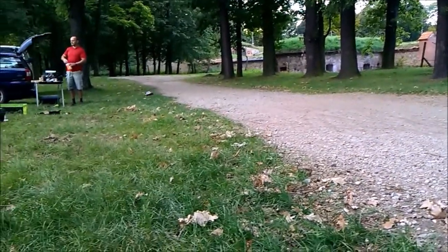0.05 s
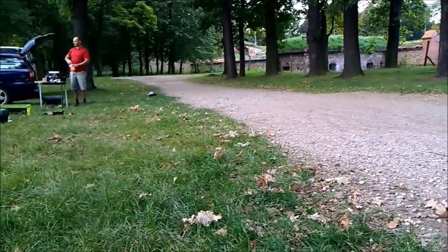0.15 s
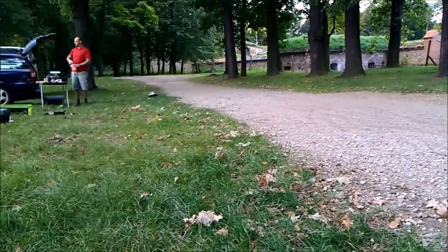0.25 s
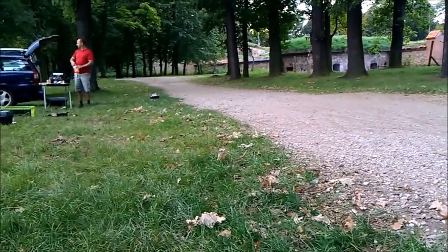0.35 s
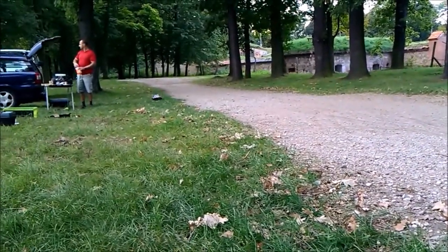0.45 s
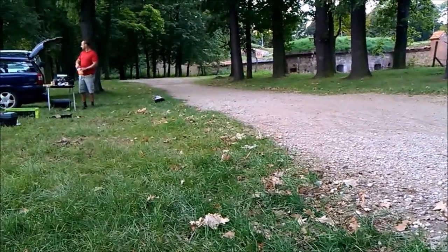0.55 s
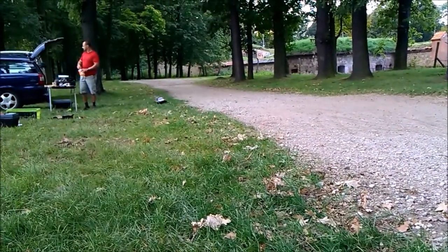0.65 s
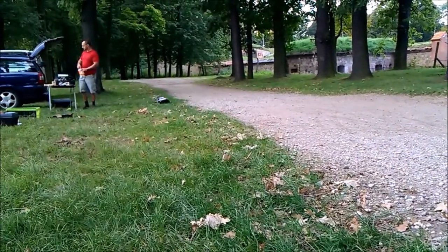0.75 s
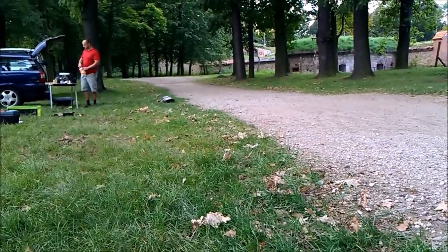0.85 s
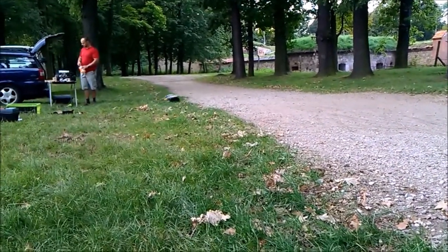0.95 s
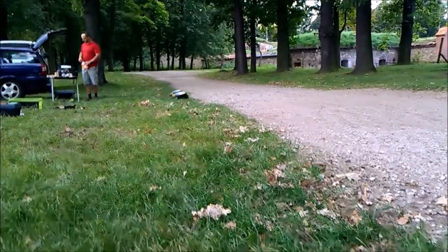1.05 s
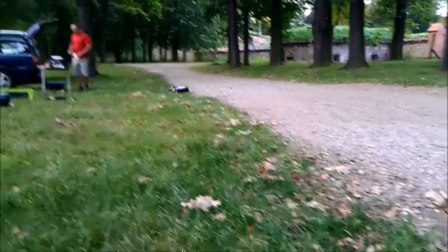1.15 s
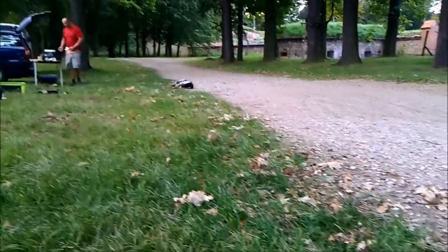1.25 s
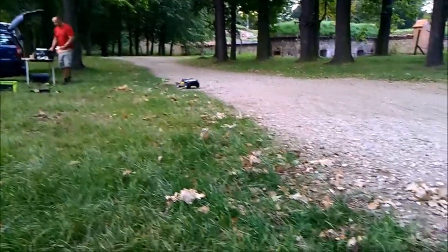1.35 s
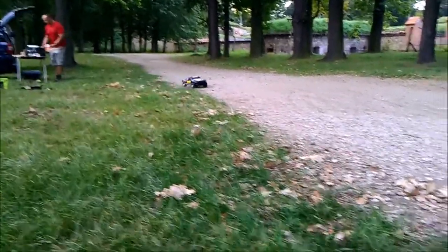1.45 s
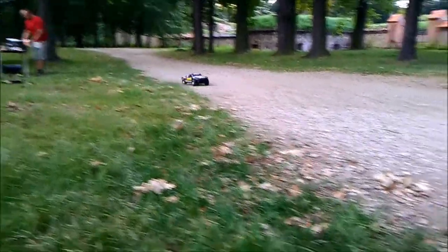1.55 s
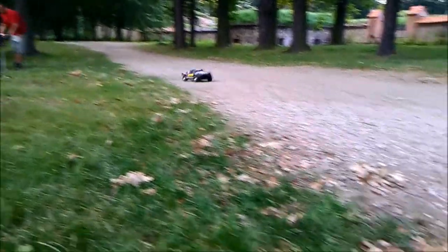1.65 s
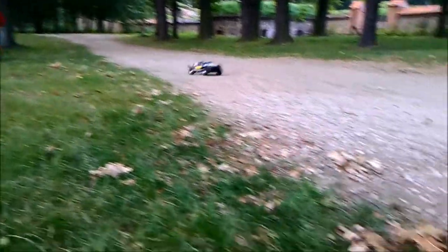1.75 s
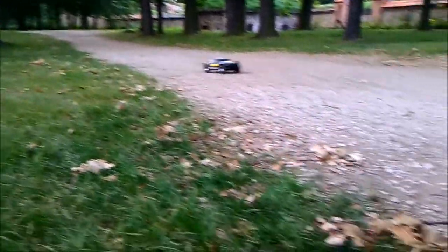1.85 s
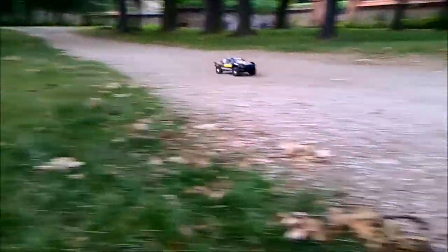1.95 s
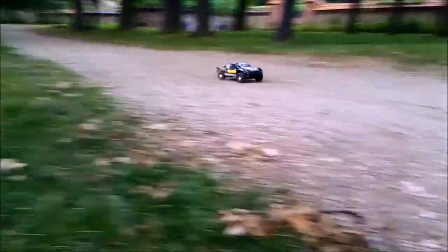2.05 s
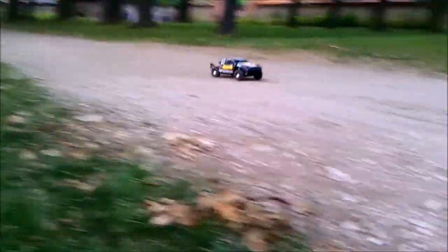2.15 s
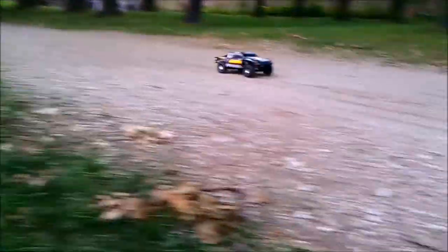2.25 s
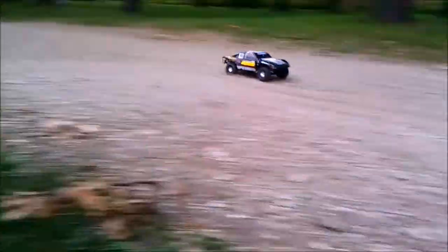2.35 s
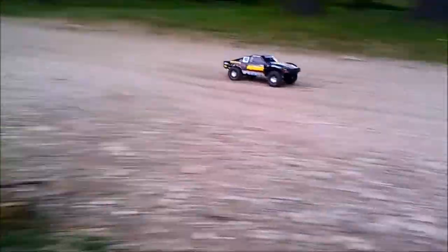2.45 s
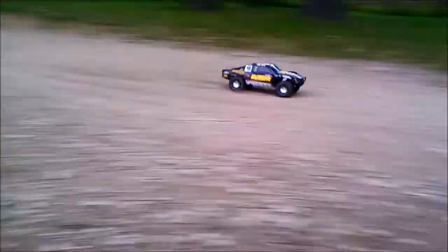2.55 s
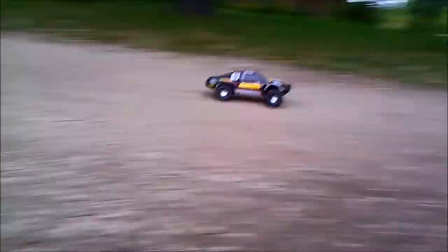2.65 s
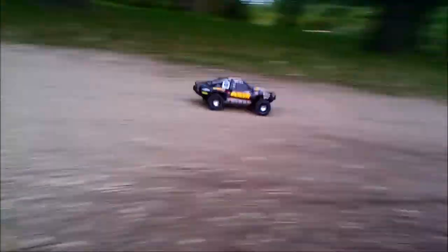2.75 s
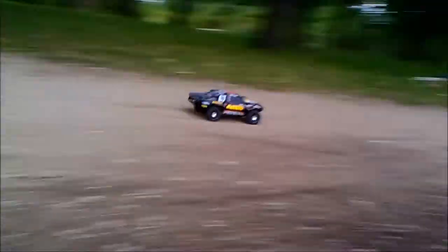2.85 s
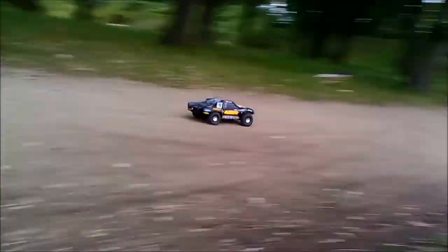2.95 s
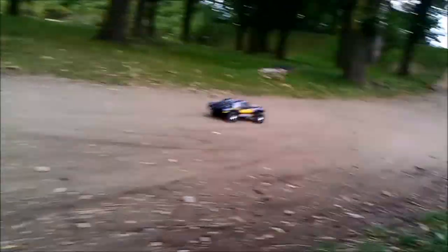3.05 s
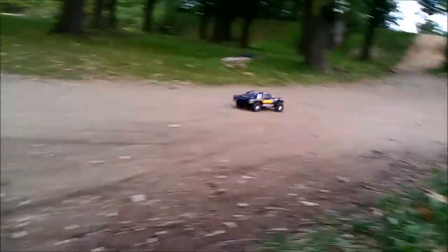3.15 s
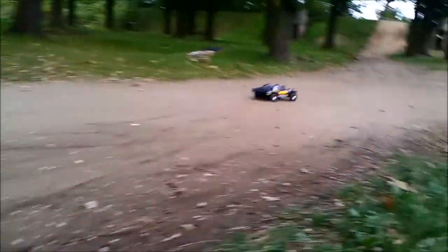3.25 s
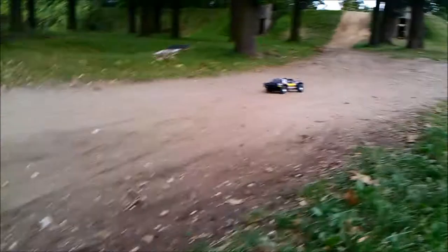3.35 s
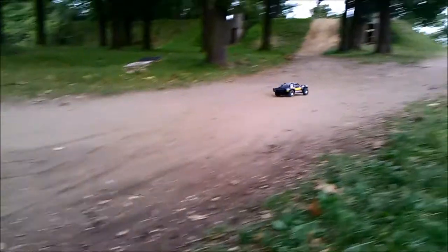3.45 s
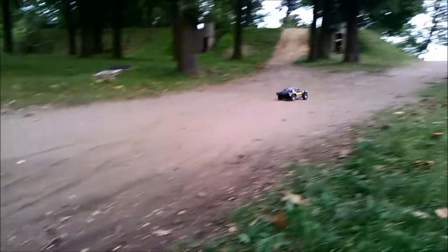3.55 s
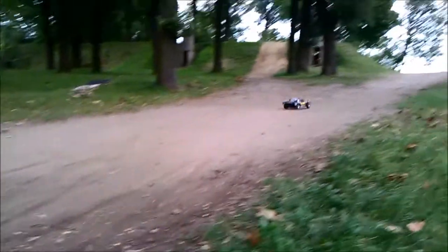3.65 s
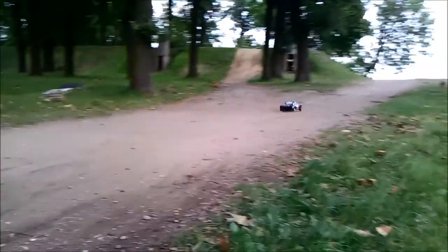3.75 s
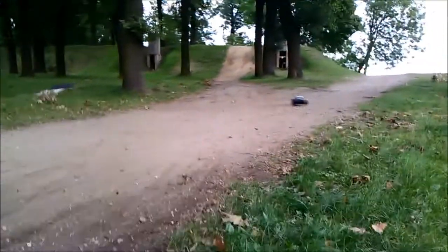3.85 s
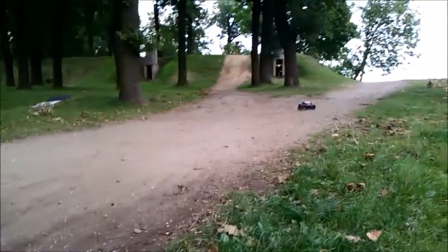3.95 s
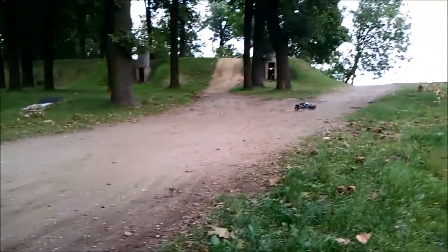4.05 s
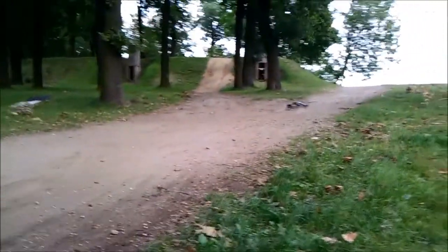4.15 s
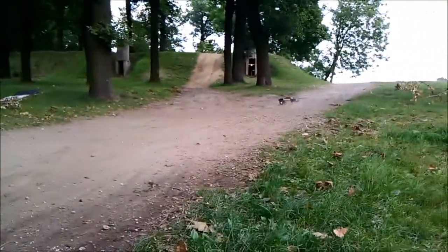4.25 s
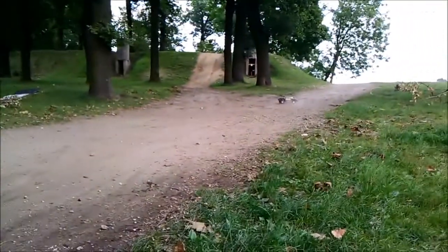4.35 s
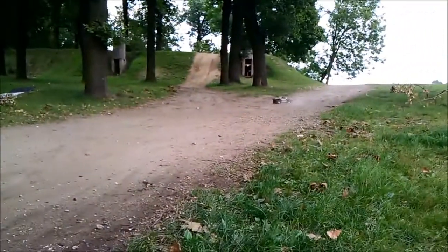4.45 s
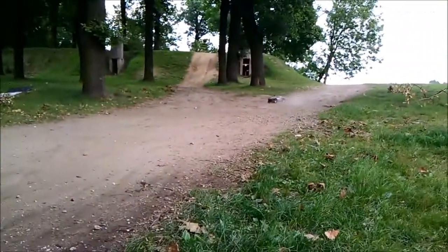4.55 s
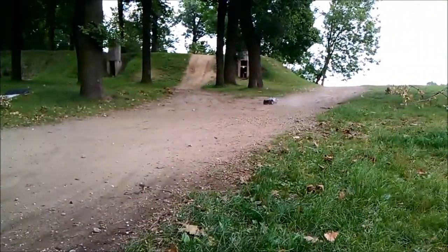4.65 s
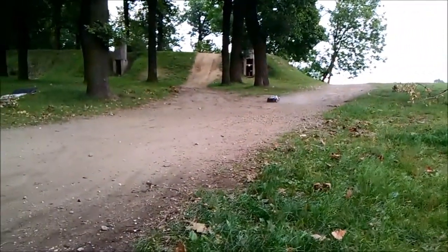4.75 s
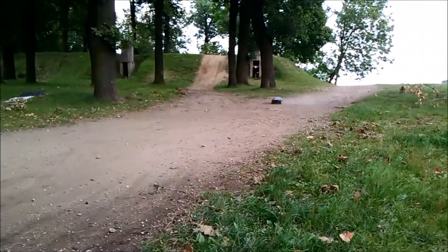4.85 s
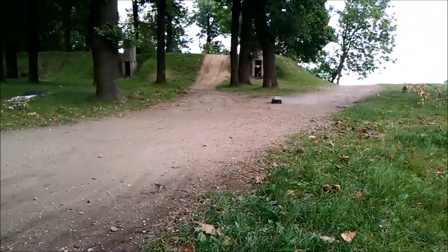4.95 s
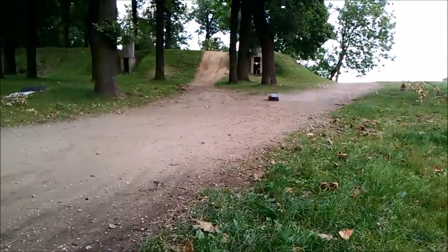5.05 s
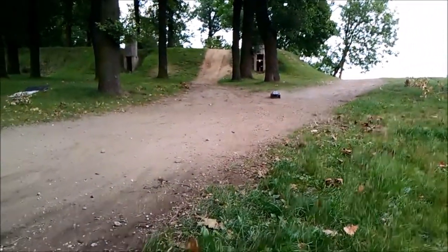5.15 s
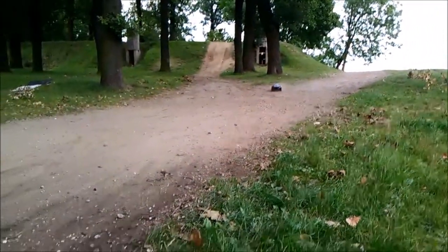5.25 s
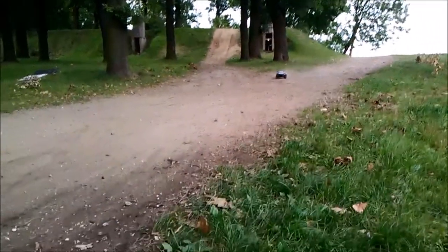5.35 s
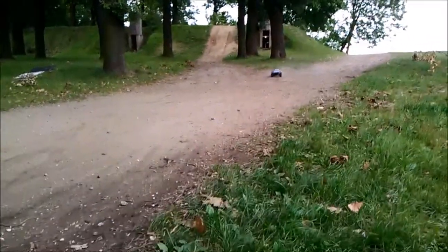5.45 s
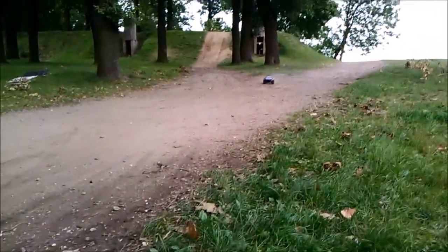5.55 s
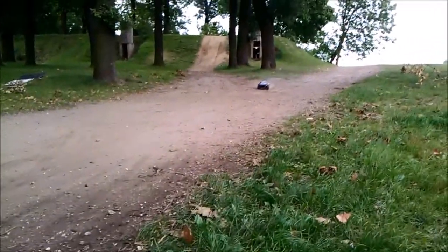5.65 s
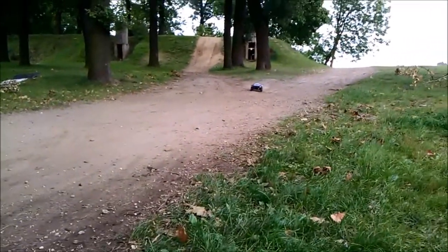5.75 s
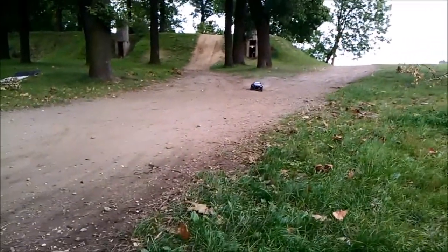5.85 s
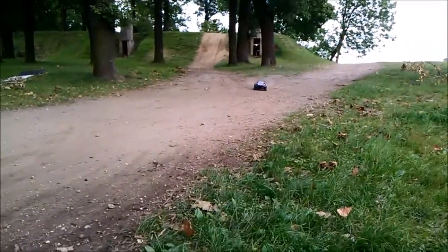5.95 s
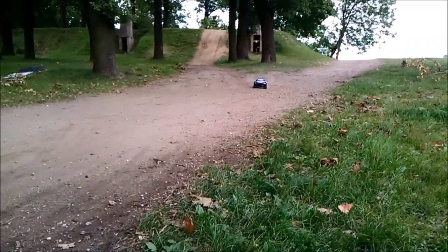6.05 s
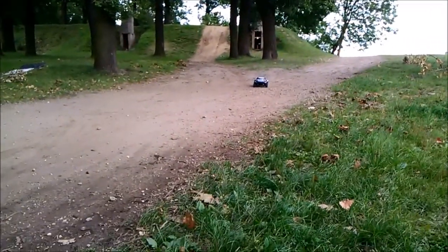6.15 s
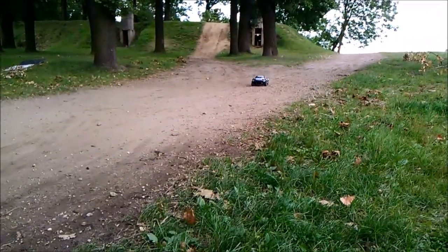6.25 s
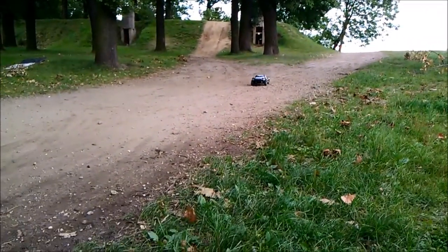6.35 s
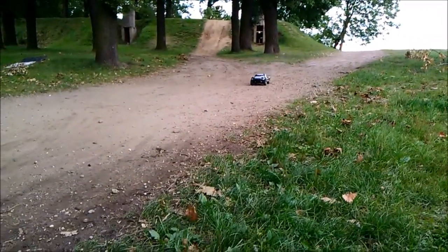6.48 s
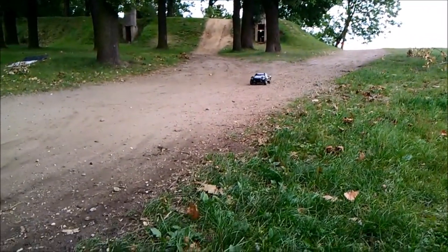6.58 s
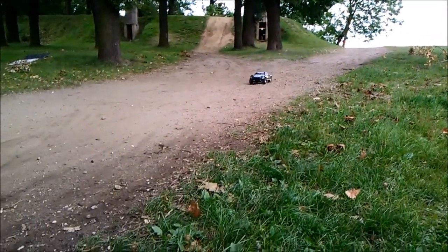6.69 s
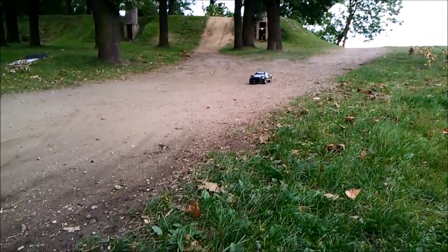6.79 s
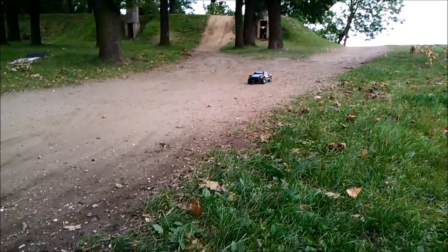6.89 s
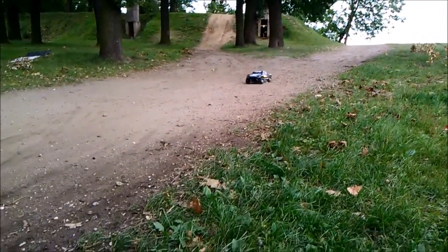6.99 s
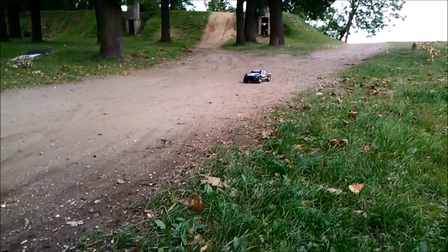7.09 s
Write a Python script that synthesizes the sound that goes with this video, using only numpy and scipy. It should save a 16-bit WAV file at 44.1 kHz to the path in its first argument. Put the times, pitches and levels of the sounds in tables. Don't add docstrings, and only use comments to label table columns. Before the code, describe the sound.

Outdoors in a park, a small electric model truck approaches on gravel, its worn gears whining higher as tyres crunch and drum its hollow plastic shell. It passes close, stones ticking and rapping, recedes, skids with a harsh grit burst, quiets, then sets off again. A far car hums through two gears early; wind puffs bump the open phone microphone.

```python
import sys
import numpy as np
from scipy import signal
from scipy.fft import rfft, irfft
from scipy.io import wavfile
from scipy.ndimage import uniform_filter1d

SR = 44100
rng = np.random.default_rng(int(sys.argv[2]) if len(sys.argv) > 2 else 0)


def how_loud(loudness_db):
    steps = np.asarray(loudness_db, float) / 20
    return 10 ** steps


def transcribe(signal):
    frames = np.atleast_2d(signal).T
    limited = np.clip(frames, -1, 1)
    pcm = np.round(limited * 32767).astype(np.int16)
    wavfile.write(sys.argv[1], SR, pcm)


N = 313992

# start_s, loudness_db, tyre_scrub_db, throttle_db, shell_ringing_share
DRIVE = [(0, -48, .5, -1.5, .3), (.45, -50, 2.5, 0.5, 0.37), (.9, -45, 1.5, 1.5, 0.43),
         (1.45, -42.5, 2.5, 1.5, 0.47), (1.85, -37.5, -5.5, 1, 0.2), (2.15, -35.5, -3, 0, 0.18),
         (2.45, -31.5, -1, -.5, 0.37), (2.85, -27, -4.5, -5.5, 0.5), (3.2, -30.5, -3, -1, 0.2),
         (3.5, -34, -2, -2, .5), (3.9, -41, -0.5, -5, 0.23), (4.4, -35.5, 4.8, -1.5, .05),
         (4.62, -34, 2.5, -4.5, 0.08), (4.95, -38.5, 1.5, -4, 0.07), (5.2, -42, -2.5, -4, 0.18),
         (5.55, -43, -3, -3.5, 0.29), (6.15, -42, 1.5, 1, 0.38), (6.42, -40.5, -2, -1, 0.18)]
# start_s, mesh_hz, nose_on (0-1), tooth_load (0-1), tail_on (0-1)
GEAR_MESH = [(0, 2914, 0.03, 0.16, 0), (.6, 2960, .02, .4, 0), (.8, 3084, 0.4, .7, .02),
             (1.58, 3260, 0.3, 0.5, .02), (1.63, 3720, .55, 0.6, .05), (2.05, 3730, .65, .7, 0.2),
             (2.382, 3893, .7, 0.3, 0.27), (2.519, 4067, 0.95, 0.6, 0.4), (2.721, 4130, 0.95, 0.45, 0),
             (3.05, 4196, 0.16, .6, 0.2), (3.3, 4150, 0.5, .6, 0.9), (3.6, 3946, 0.2, 0.11, 1),
             (3.78, 3800, 0.2, 0, 0.55), (5.499, 2963, 0, 0, 0), (5.62, 3050, .35, 0.4, 0.25),
             (6.42, 3240, 0.25, 1, .2)]
# centre_s, underneath_db, crunch_db, width_s
JOLTS = [(.41, 4, 0, 0.013), (1.2, 2.5, 1.5, 0.039), (1.71, 2.5, 2, 0.038), (1.79, 1.5, 3, 0.039),
         (2.11, -1, 0.5, 0.022), (2.75, 0, 0.5, 0.038), (2.9, -2, 0, .015), (2.97, -4, -2, .012),
         (3.047, -3, 0, .01), (4.4, 2, 0, .015), (4.43, -3, -1, .012), (4.74, 2, 1, .012),
         (3.99, 1.5, 1.5, .03), (4.05, 2.5, 0, 0.017), (4.16, 2.5, 1, 0.024), (4.27, 0, 1, 0.017),
         (4.31, -1.5, -4, .025), (4.36, 1, 2, 0.039), (4.52, 1.5, -1, 0.039), (4.65, 1.5, 3, 0.02),
         (4.68, -3.5, -0.5, 0.015), (4.81, -1.5, -3, 0.039), (4.86, 1.5, 1.5, 0.016),
         (5.03, -1, -2.5, 0.03), (5.48, -0.5, 1.5, 0.019), (5.77, -0.5, 1, .04), (6.16, 3, -1, 0.022)]
# pitch_hz, density_db (per Hz)
THUD = [(110, -28), (170, -7.5), (250, -3), (340, 0.5), (480, -0.5), (600, -10), (800, -34.5)]
# pitch_hz, density_db (per Hz)
SHELL = [(400, -30.5), (520, -2.5), (800, 5), (1150, 3.5), (1450, 3), (2100, 1.5), (2500, -5),
         (3000, -30.5)]
# pitch_hz, width_hz, level_db
SHELL_MODES = [(643.5, 110, 23.5), (735.3, 64, 23.5)]
# pitch_hz, density_db (per Hz)
CRUNCH = [(4300, -12.5), (4800, -10), (5300, -4), (5700, -3.5), (7500, -5.5), (8100, -9), (9300, -19.5)]
# pitch_hz, width_hz, level_db
PLATE_MODES = [(6080, 1100, -4.5), (6860, 810, -1.5)]
# pitch_hz, density_db (per Hz)
GRIT = [(5180, -41.5), (8800, -17.5), (10000, -3.5), (11500, -5), (13200, -5.5), (14600, 2.5), (15850, 3),
        (16050, -38.5)]

# pitch_hz, density_db (per Hz)
GEARBOX = [(2300, -12.5), (2700, -5.5), (3300, -0.5), (4400, -1), (4900, -4.5), (5500, -26)]
# start_s, length_s, from_hz, to_hz,
# top_db
AXLE = [
    (2.78, .2, 3760, 3720, -35),
    (3.04, .16, 3720, 3680, -39),
    (3.18, .18, 3430, 3380, -40),
    (2.55, .2, 3450, 3450, -42),
    (2.4, 0.77, 4580, 5300, -46),
    (2.72, 0.6, 1900, 1600, -40),
    (1.9, 0.74, 1440, 1380, -43),
    (2.2, .32, 3880, 3870, -40),
        (5.62, .9, 1540, 1440, -48),
    (5.9, .65, 3480, 3500, -48.5),
    (.9, .6, 3150, 3550, -49),
]
# start_s, length_s, from_hz, to_hz, top_db
SIDE_PANEL = [
    (2.27, .5, 990, 990, -42),
    (2.6, 1.05, 960, 1000, -40),
    (2.15, 1.75, 742, 750, -39.5),
    (2.4, 1.4, 650, 645, -40.5),
    (5.65, .95, 750, 760, -49),
]
# start_s, length_s, from_hz, to_hz, top_db
COVER_RING = (1.5, 1.1, 11300, 11800, -52)

# start_s, peak_db, pitch_hz,
# t60_s
TICKS = [(1.5667, -20.5, 6000, 0.0085), (1.7785, -24, 6570, 0.0086), (2.2385, -18.5, 7300, 0.0058),
         (2.2924, -32, 5660, 0.0093), (2.3904, -18, 6470, 0.0098), (2.5726, -16, 7220, 0.0092),
         (2.8774, -17, 6870, 0.014), (2.9814, -16, 7150, 0.0069), (3.336, -17, 5985, 0.0092),
         (4.025, -22, 6640, 0.0082), (4.1283, -17.5, 7180, 0.0056), (4.1493, -21, 6560, 0.008),
         (4.1587, -22, 5980, 0.008), (4.2784, -20, 7500, 0.0071), (4.3288, -23, 6150, 0.006),
         (4.352, -13, 6780, 0.0056), (4.442, -17.5, 6850, 0.0083), (4.6222, -15, 6750, 0.0096),
         (4.7708, -21, 6650, 0.0079), (4.8323, -24, 6840, 0.0084), (4.8525, -14, 7150, 0.008),
         (4.9319, -23, 6450, 0.008),
         (0.946, -26, 6030, 0.0055),
    (1.1497, -24, 6300, 0.012),
    (1.1944, -19, 6400, 0.0089),
    (1.3309, -29, 6130, 0.0094),
]
# start_s, peak_db, pitch_hz, t60_s
BIG_TICKS = [
    (1.3886, -8, 6860, .011),
    (1.3898, -25, 3900, .008),
    (1.505, -18, 6800, .012),
    (6.0062, -22, 7300, .008),
]
# start_s, peak_db
FLICKS = [(1.7509, -27), (1.7784, -27.5), (2.4518, -23), (2.6055, -24.5), (2.6638, -29.5), (3.3353, -16),
          (3.4031, -29), (3.4421, -28), (4.0123, -29), (4.0243, -27), (4.1265, -13.5), (4.2769, -24),
          (4.358, -27), (4.6224, -29.5), (4.8534, -33), (6.0065, -19)]
# start_s, peak_db, pitch_hz, t60_s
KNOCKS = [(2.991, -14, 1000, 0.027), (4.1505, -13, 1400, 0.014), (4.1694, -15, 1380, 0.015),
          (4.4463, -20, 1414, 0.022), (4.4817, -22, 1360, 0.022), (4.541, -17.5, 1340, 0.016),
          (4.584, -17, 1090, 0.013), (4.622, -28, 1180, 0.015), (4.734, -24, 1420, 0.015),
          (4.395, -21, 1360, 0.014), (4.415, -23, 910, .02), (4.512, -22, 800, .02),
          (4.64, -24, 1300, 0.016), (5.028, -25.5, 804, 0.023), (6.0065, -30, 1200, .015)]
# start_s, peak_db, pitch_hz
DRUMS = [(2.398, -27, 751), (2.421, -27, 724), (2.446, -26, 713), (2.486, -24, 732), (2.575, -22, 756),
         (2.633, -28, 686), (2.684, -21, 740), (2.733, -22, 665), (2.788, -21, 743), (2.826, -20, 740),
         (2.853, -17, 746), (2.908, -21, 673), (2.939, -23, 641), (2.996, -22, 754), (3.026, -20, 624),
         (3.102, -21, 746), (3.142, -26, 748), (3.168, -25, 738), (3.21, -25, 681), (3.291, -24, 751),
         (3.37, -23, 638), (3.425, -25, 641), (3.446, -27, 764), (3.475, -27, 743), (3.526, -26, 651),
         (4.317, -37, 627), (4.353, -30, 630), (4.387, -31, 670), (4.482, -27, 649), (4.527, -30, 689),
         (4.579, -27, 697), (4.645, -31, 665), (4.709, -29, 711), (4.734, -32, 703), (4.778, -34, 646),
         (4.831, -34, 643), (4.875, -30, 759)]
# start_s, peak_db, pitch_hz
BED = [(2.446, -29, 996), (2.488, -25, 953), (2.534, -26, 1010), (2.559, -27, 974), (2.634, -27, 969),
       (2.664, -30, 950), (2.725, -23, 972), (2.764, -26, 956), (2.801, -25, 985), (2.832, -23, 953),
       (2.874, -25, 974), (2.914, -26, 999), (2.953, -31, 1050), (2.992, -19, 1000), (3.063, -22, 985),
       (3.101, -20, 972), (3.142, -25, 958), (3.178, -24, 958), (3.219, -26, 950), (3.248, -27, 1060),
       (3.328, -25, 993), (3.367, -28, 993), (3.445, -28, 980), (3.484, -32, 1000), (3.519, -30, 1000),
       (3.589, -31, 985)]
# start_s, peak_db, pitch_hz
RAPS = [(4.2592, -31, 2010), (4.2782, -30, 1810), (4.3305, -33, 1980), (4.3944, -28, 1590),
        (4.4458, -21, 2060), (4.4827, -26, 2080), (4.5136, -28, 1870), (4.5401, -23, 1620),
        (4.5655, -25, 2010), (4.583, -22, 2080), (4.6224, -26, 1930), (4.7366, -30, 1920),
        (4.7775, -31, 1910), (4.8548, -29, 2050), (4.9087, -30, 2150), (4.9621, -33, 1540)]
# start_s, peak_db, pitch_hz
RUTS = [(1.679, -32, 479), (1.71, -29, 460), (1.758, -32, 398), (1.848, -32, 353), (1.938, -33, 428),
        (1.992, -32, 361), (2.112, -25, 339), (2.326, -30, 404), (2.453, -31, 355), (2.485, -33, 406),
        (2.545, -28, 493), (2.629, -27, 455), (2.677, -25, 312), (2.738, -26, 436)]
# start_s, peak_db, pitch_hz, t60_s
BUMPS = [
    (1.687, -33, 110, .06),
    (1.78, -30, 335, 0.044),
    (1.86, -33, 80.4, 0.039),
]
# start_s, peak_db, pitch_hz
GRINDS = [(2.4853, -21, 4080), (2.5137, -19, 3990), (2.61, -20, 4090), (2.6643, -21, 4080),
          (2.7417, -20, 4020), (2.799, -22, 4220), (2.8684, -18, 3740), (2.9048, -20, 3700),
          (3.0859, -21, 4100), (3.1258, -21, 3700), (3.3353, -17, 4130), (3.4476, -21, 4020)]
# start_s, level_db, from_hz, to_hz, length_s
SNAPS = [
    (5.3437, -13, 10000, 2400, .0014),
    (5.3436, -17, 16000, 5000, .0008),
    (5.099, -18.5, 10000, 3000, .001),
]

# start_s, firing_half_order_hz, engine_load_db, upper_orders_db (muffled by trees)
CAR = [(0.1, 29.9, -12, -4), (0.43, 35.6, -2, -0.5), (.8, 38.5, -2, 1.5), (1.18, 43.9, 3, -5),
       (1.34, 37.9, -8, 6.5), (1.6, 31.5, -15, -5), (1.71, 34.7, -2, 3), (2.1, 39, -2, -1.5),
       (2.47, 43.6, 1.5, 0), (2.6, 43.6, 1, -9.5), (2.88, 41, -6.5, 3)]
ORDERS_DB = (-50.5, -54, -58.5)
ORDERS_LOAD = (1., .05, .05)
# start_s, length_s, from_hz, to_hz, top_db
CAR_FAR = (3.75, 1.4, 92, 68, -58.5)
# centre_s, peak_db, width_s
GUSTS = [(3.03, -47, .12), (3.27, -51, .04), (3.38, -39, 0.026), (3.52, -42, 0.062), (3.65, -49.5, .08),
         (3.8, -46, .03), (4.15, -58, .06), (4.41, -54, .03), (4.74, -53, 0.022), (5.66, -37.5, 0.055),
         (5.73, -38.5, .025), (5.88, -42, 0.027), (6.0, -56, 0.077), (6.17, -45.5, 0.024), (6.3, -53, .04)]
# pitch_hz, density_db (per Hz)
PUFF = [(15, -9.5), (40, -2.5), (75, -2.5), (160, -6), (300, -24.5)]
# pitch_hz, density_db (per Hz)
PARK = [(12, -43.5), (20, -9), (109, -2), (268, -16), (296, -8.5), (400, -9), (520, -32.5), (880, -120)]
# pitch_hz, density_db (per Hz)
LEAVES = [(7000, -30), (8200, -3), (11500, 0), (15800, 2), (16050, -40)]
# pitch_hz, width_hz, depth (0-1)
PORT_NOTCHES = [(9280, 450, .12), (13200, 450, .1)]
# pitch_hz, width_hz, need (0-1)
STARVED = [(9300, 650, 1.), (11800, 300, .55), (13200, 550, .95)]


def tyres():
    level_db, scrub_db, _, ring = curves(DRIVE)
    land_db = sum(under_db * bell(s, width) for s, under_db, _, width in JOLTS)
    crack_db = sum(top_db * bell(s, width) for s, _, top_db, width in JOLTS)
    thud_db = -48 + 0.75 * (level_db + 42) + 2.06 * land_db
    crunch_db = level_db + scrub_db + crack_db
    nose = np.clip(curves(GEAR_MESH)[1], 0, 1)
    grit_db = crunch_db - 6.5 + 0.1 * (level_db + 42.5) + 3.5 * nose ** 3
    grit_db = grit_db + 4.5 * bell(1.85, 0.45) + 0.79 * chance(28)

    fine = 1 - 0.37 * bell(4.45, 0.41)
    under = gravel(2500, 2.44, 1.24 * fine, 1.3, 23.8) * wheel(1.1)
    top = gravel(1400, 4.0, 2.5 * fine, 1.3, 63.0) * wheel(1.1)
    top = patchy(top, 2.2, frames=22, bins=3)

    ring = np.clip(ring, 0, 1)
    dull = colour(patchy(under, 2.0, frames=20, bins=2), SHELL)
    ringing = colour(under[::-1], SHELL, SHELL_MODES) * wheel(0.57)
    rumble = np.sqrt(1 - ring) * dull + np.sqrt(ring) * ringing
    low = how_loud(thud_db) * colour(under, THUD) + how_loud(level_db + land_db) * rumble
    crunch = how_loud(crunch_db) * colour(top, CRUNCH, PLATE_MODES)
    return low + crunch + how_loud(grit_db) * colour(top, GRIT)


def gears():
    hz, nose, load, tail = curves(GEAR_MESH)
    level_db, _, throttle_db, _ = curves(DRIVE)
    sharp = 0.64 * np.clip(nose, 0, 1)
    blurred = 0.4 * np.clip(load, 0, 1)

    wobbling_hz = hz * (1 + 0.012 * chance(14))
    whine = np.sqrt(sharp) * whistle(wobbling_hz, 85) + np.sqrt(blurred) * whistle(hz * 1.03, 350)
    rattle = colour(patchy(gravel(4000, 1.4, 1.8, 0.97, 35), 2.5, frames=24, bins=2), GEARBOX)
    mesh = whine * wheel(0.94) * how_loud(1.3 * chance(24))
    mesh = mesh + np.sqrt(np.maximum(1 - sharp - blurred, 0.04)) * rattle
    third_db = -12.5 - 0.05 * np.maximum(hz - 3830, 0)
    third = whistle(11600 + 0.98 * (hz - 3800), 330) * how_loud(3 * chance(20.5))
    mesh = mesh + how_loud(third_db) * (0.3 + sharp) * third

    half = how_loud(level_db - 2.1) * tail * whistle(hz / 2, 80) * wheel(2) * how_loud(1.5 * chance(30))
    axle = sum(strand(*row, width_hz=61, throb_db=2.4) for row in AXLE)
    panels = sum(strand(*row, width_hz=24, throb_db=3.6) for row in SIDE_PANEL)
    cover = strand(*COVER_RING, width_hz=400, throb_db=2)
    return how_loud(level_db + throttle_db) * mesh + half + axle + panels + cover


def chassis_stones():
    flicks = [(s, db, 15500 - 48.5 * (db + 30.5), 0.006) for s, db in FLICKS]
    ticks = stones(TICKS, 0.99, -2, 0.0011, crack=0.45)
    big = stones(BIG_TICKS, 0.875, -1.5, 0.0008)
    return ticks + big + stones(flicks, 0.92, 0, 0.00054, crack=0.49)


def shell_stones():
    knocks = stones(KNOCKS, 1.48, -0.74, 0.001, crack=0.27)
    drums = stones(with_decay(DRUMS + BED, -1.5, 0.1), 0.96, -8, 0.003, crack=0.15)
    return knocks + drums + stones(with_decay(RAPS, -5, 0.03), 0.78, -3, 0.0012, crack=0.3)


def chassis_thumps():
    return stones(BUMPS, 0.795, -2, 0.0055) + stones(with_decay(RUTS, -3, 0.08), 0.8, -6, 0.005)


def gearbox_grit():
    return stones(with_decay(GRINDS, -4, 0.035), 1.04, -4, 0.002, crack=0.4)


def snaps():
    out = np.zeros(N)
    for s, db, from_hz, to_hz, length in SNAPS:
        u = np.linspace(0, 1, round(length * SR))
        hz = from_hz * (to_hz / from_hz) ** u
        swell = 1.7 * u * np.sin(np.pi * u)
        out[round(s * SR):][:len(u)] = how_loud(db) * swell * np.sin(2 * np.pi * np.cumsum(hz) / SR)
    return out


def car():
    hz, load_db, muffle_db = curves(CAR)
    turns = np.cumsum(hz) / SR
    fade = np.clip((3 - np.arange(N) / SR) / 0.091, 0, 1)
    lines = np.zeros(N)
    for order, db, share in zip((2, 3, 4), ORDERS_DB, ORDERS_LOAD):
        order_db = db + share * load_db + muffle_db * (order > 2) + 1.5 * chance(15)
        lines += how_loud(order_db) * np.sin(2 * np.pi * order * turns)
    return np.sqrt(2) * fade * lines + strand(*CAR_FAR, width_hz=8.45, throb_db=0)


def wind():
    breeze = how_loud(-64) * np.clip((np.arange(N) / SR - 2.8) / 0.21, 0, 1)
    blow = breeze + sum(how_loud(db) * bell(s, width) for s, db, width in GUSTS)
    return blow * colour(rng.standard_normal(N) * how_loud(3 * chance(25)), PUFF)


def park():
    recede = np.interp(np.arange(N) / SR, [2.6, 3.9], [1, 0.3])
    hum = how_loud(-52) * colour(rng.standard_normal(N), PARK) * recede
    leaves = colour(patchy(rng.standard_normal(N), 1.5, frames=8, bins=12), LEAVES)
    return hum + how_loud(-60 + 1.5 * chance(14)) * leaves


def gravel(per_s, spread_db, hiss, flicker_db, flicker_hz):
    size = how_loud(spread_db * np.minimum(rng.exponential(1, N), 4.2)) * rng.standard_normal(N)
    cracks = evened(size * (rng.random(N) < per_s / SR))
    return (cracks + hiss * rng.standard_normal(N)) * how_loud(flicker_db * chance(flicker_hz))


def wheel(depth_db):
    turns = np.cumsum(curves(GEAR_MESH)[0]) / SR / 158
    return how_loud(depth_db * np.cos(2 * np.pi * turns))


def stones(rows, pair, pair_db, rise_s, crack=0):
    out, t = np.zeros(N), np.arange(4000) / SR
    for s, db, hz, t60 in rows:
        grit = uniform_filter1d(rng.standard_normal(len(t)), size=9) * 3
        ring = np.sin(2 * np.pi * hz * t) + how_loud(pair_db) * np.sin(2 * np.pi * hz * pair * t)
        ring *= 1 + crack * grit
        ring *= how_loud(-60 * t / max(t60, 0.002)) * (1 - np.exp(-(t / rise_s) ** 2))
        out[round(s * SR):][:len(t)] += how_loud(db) * ring / abs(ring).max()
    return out


def with_decay(rows, gain_db, t60_s):
    return [(s, db + gain_db, hz, t60_s) for s, db, hz in rows]


def strand(start, length, from_hz, to_hz, top_db, width_hz, throb_db):
    u = np.clip((np.arange(N) / SR - start) / length, 0, 1)
    arch = how_loud(top_db - 20 * (2 * u - 1) ** 4) * (u % 1 > 0)
    return arch * whistle(from_hz + (to_hz - from_hz) * u, width_hz) * wheel(throb_db)


def whistle(hz, width_hz):
    turn = np.exp(2j * np.pi * np.cumsum(hz) / SR)
    return evened((turn * (chance(width_hz) + 1j * chance(width_hz))).real)


def patchy(x, patch_db, frames, bins):
    z = signal.stft(x, nperseg=512)[2]
    z = z * how_loud(patch_db * blotches(z.shape, bins, frames))
    return evened(signal.istft(z, nperseg=512)[1][:N])


def blotches(shape, bins, frames):
    field = uniform_filter1d(rng.standard_normal(shape), bins, axis=0)
    return evened(uniform_filter1d(field, frames, axis=1))


def colour(x, points, modes=()):
    hz, (f, db) = np.fft.rfftfreq(N, 1 / SR), np.transpose(points)
    gain = how_loud(np.interp(np.log(hz + 1), np.log(f), db, left=-90, right=-90))
    bumps = 1 + sum(how_loud(db) / np.hypot(1, 2 * (hz - f) / w) ** 3 for f, w, db in modes)
    return evened(irfft(rfft(x) * gain * bumps, N))


def chance(hz):
    return evened(signal.lfilter(*signal.butter(2, hz, fs=SR), rng.standard_normal(N)))


def bell(s, width):
    return np.exp(-((np.arange(N) / SR - s) / width) ** 2)


def curves(rows):
    s, *columns = np.transpose(rows)
    return [np.interp(np.arange(N) / SR, s, c) for c in columns]


def evened(x):
    return x / np.sqrt(np.mean(x ** 2) + 1e-20)


def scene():
    hits = chassis_stones() + shell_stones() + chassis_thumps() + gearbox_grit() + snaps()
    return (tyres() + gears() + hits + car() + wind() + park())[None]


def starve(x):
    hz, _, z = signal.stft(x, SR, nperseg=1024)
    need = sum(share * np.exp(-((hz - f) / width) ** 2) for f, width, share in STARVED)[:, None]
    luck = blotches(z.shape, 4, 3) + 0.6 * blotches(z.shape, 30, 40)
    holes = (luck > 3.3 - 2.1 * need) & (need > 0.1)
    return signal.istft(z * np.where(holes, how_loud(-30), 1), SR, nperseg=1024)[1][None, :N]


def top_cut(x):
    return signal.sosfilt(signal.butter(12, 16970, fs=SR, output="sos"), x)


def record(dry):
    hz = np.fft.rfftfreq(N, 1 / SR)
    port = np.prod([1 - depth * np.exp(-((hz - f) / width) ** 2) for f, width, depth in PORT_NOTCHES], axis=0)
    heard = irfft(rfft(dry) * port, N)
    smooth = signal.oaconvolve(heard, signal.firwin(511, 15800, fs=SR)[None], "same")
    mix = starve(smooth[0]) * (np.arange(N) < 6.4198 * SR)
    return top_cut(mix)


dry = scene()
out = record(dry)
transcribe(out)
```